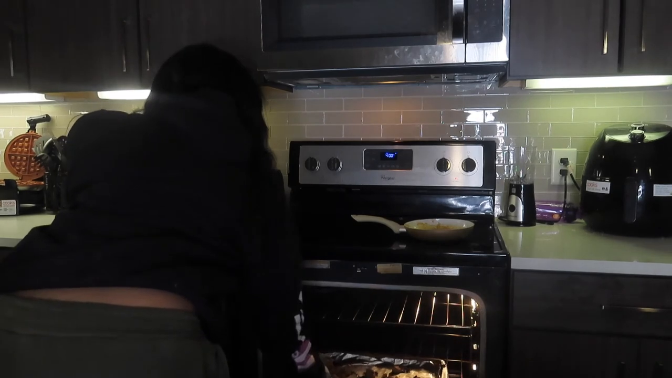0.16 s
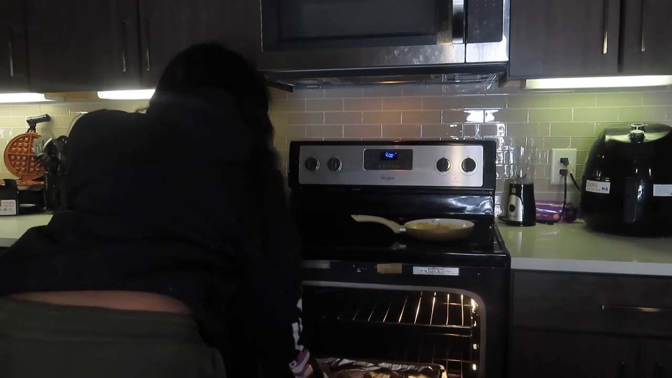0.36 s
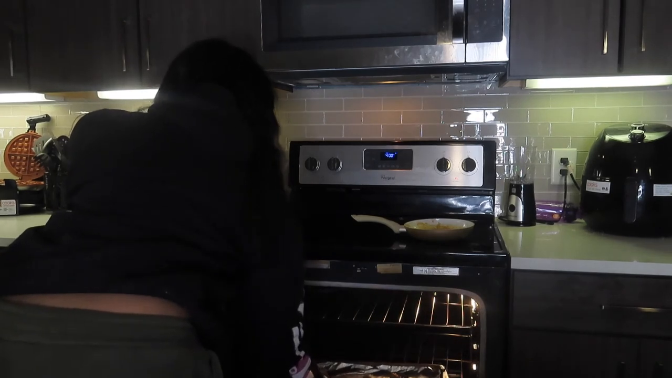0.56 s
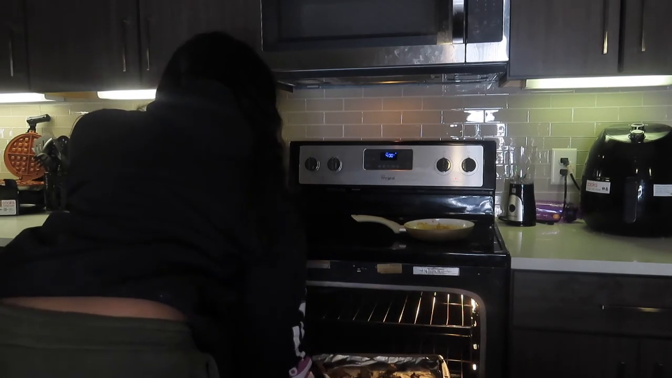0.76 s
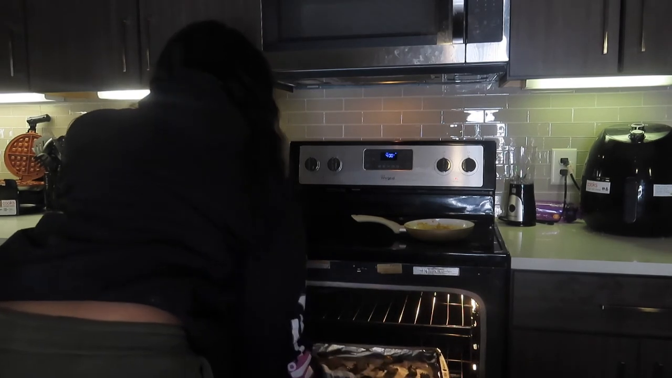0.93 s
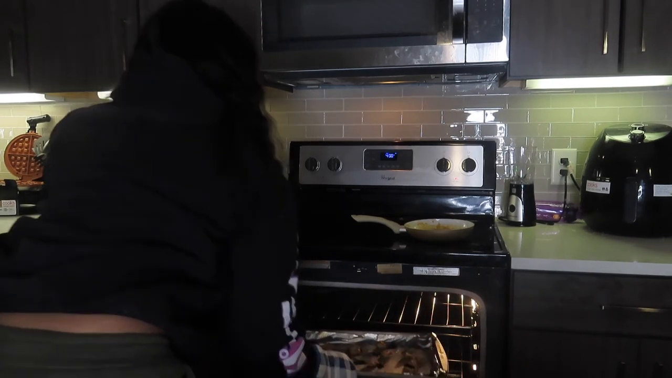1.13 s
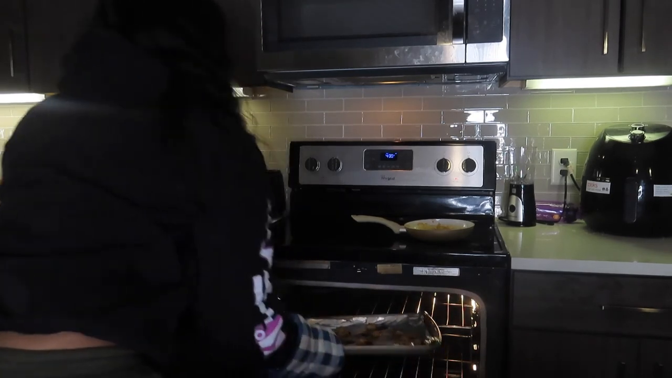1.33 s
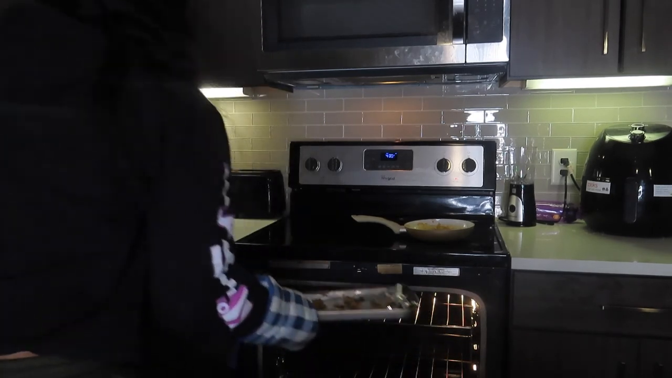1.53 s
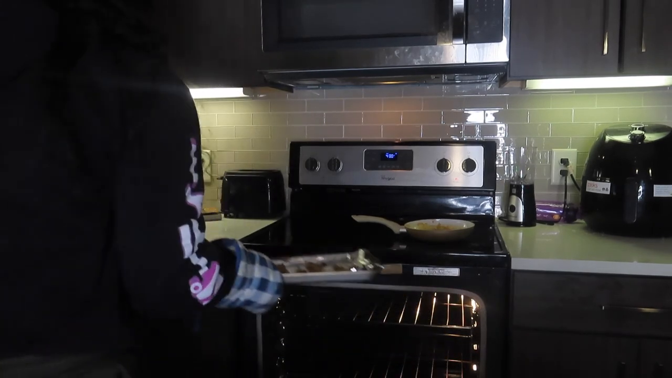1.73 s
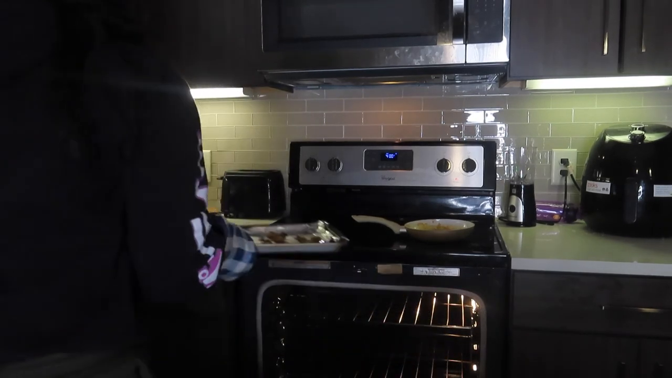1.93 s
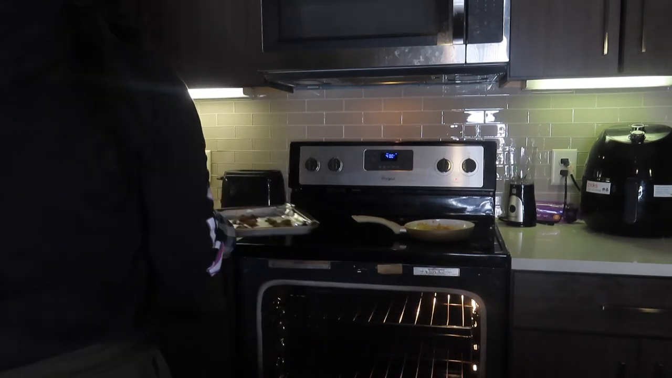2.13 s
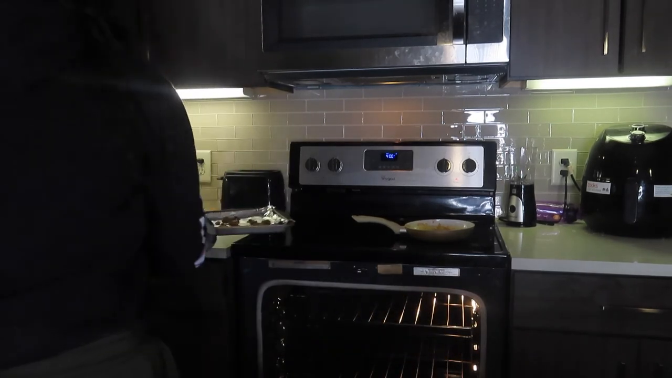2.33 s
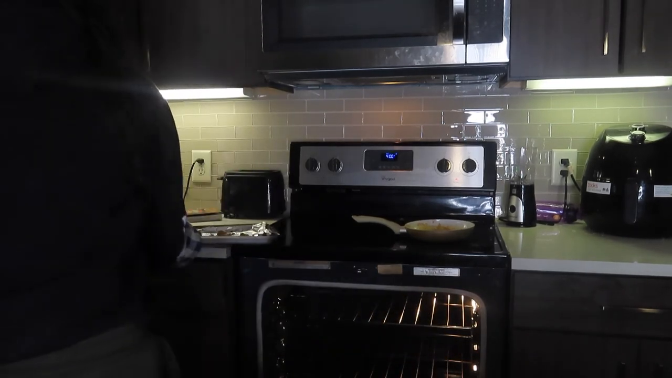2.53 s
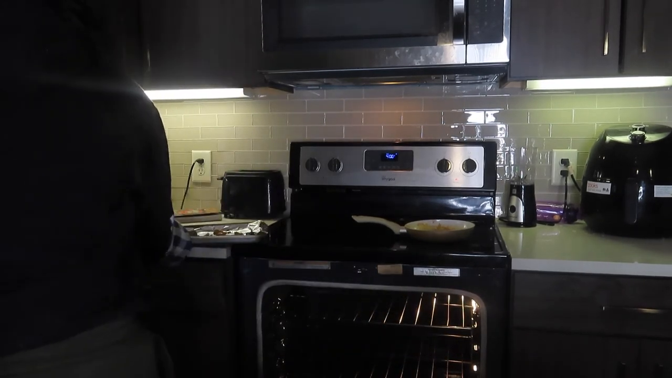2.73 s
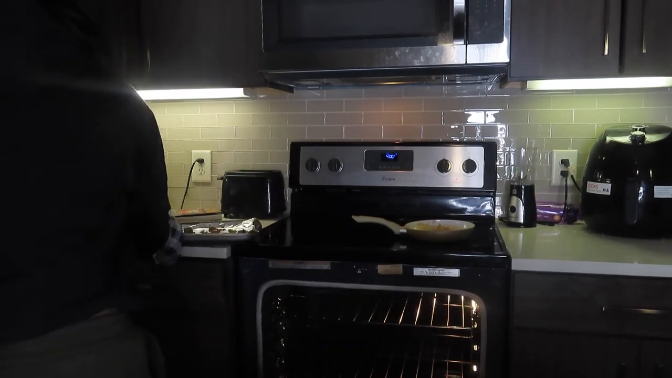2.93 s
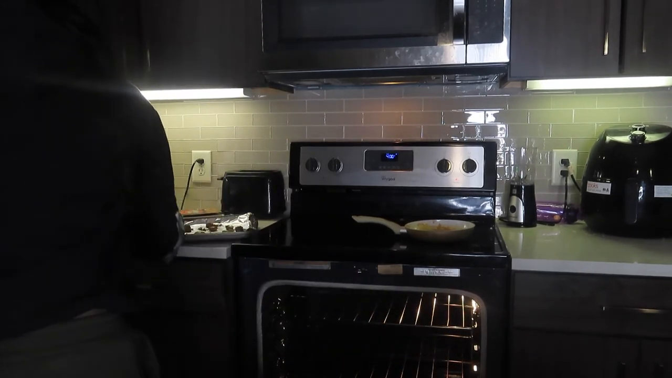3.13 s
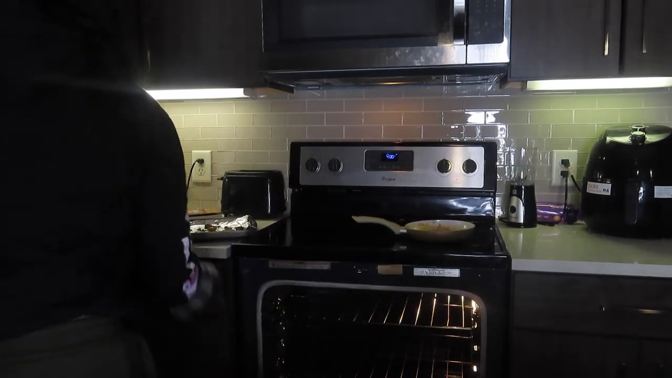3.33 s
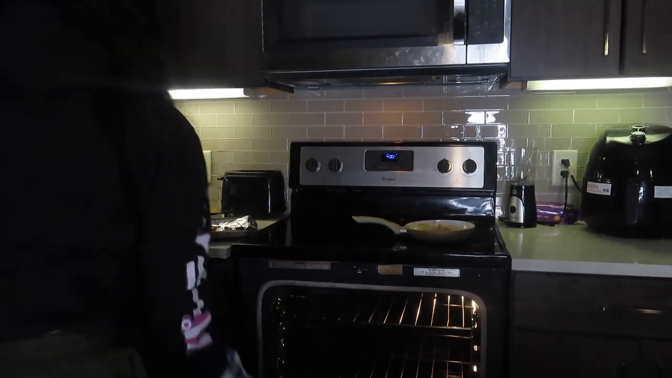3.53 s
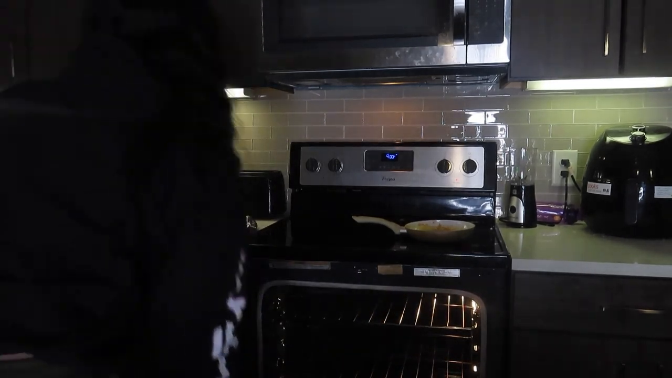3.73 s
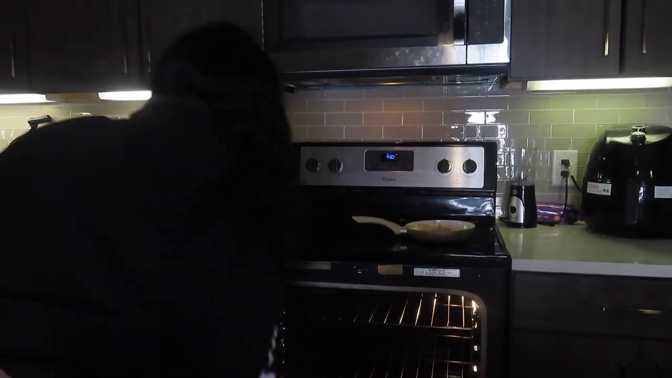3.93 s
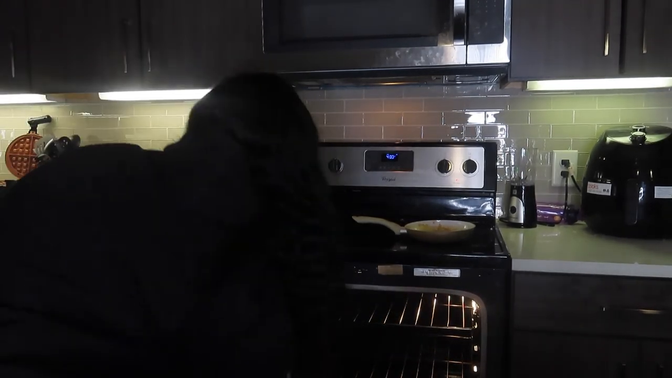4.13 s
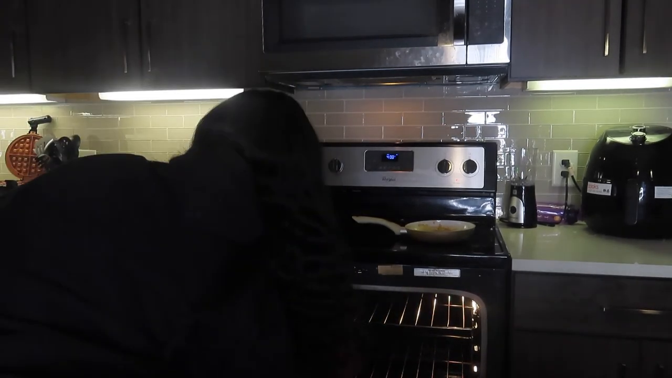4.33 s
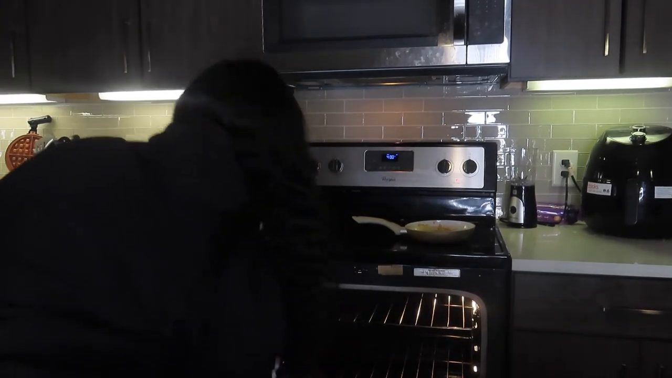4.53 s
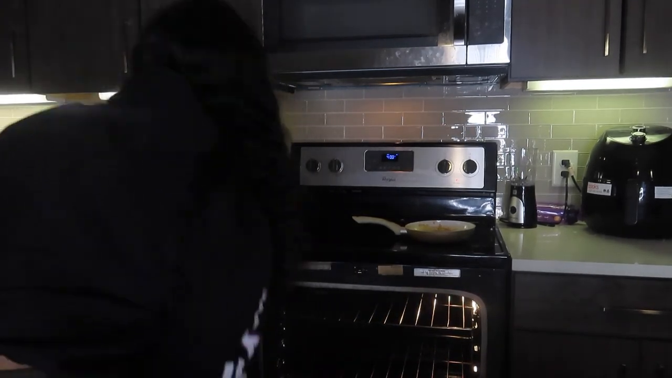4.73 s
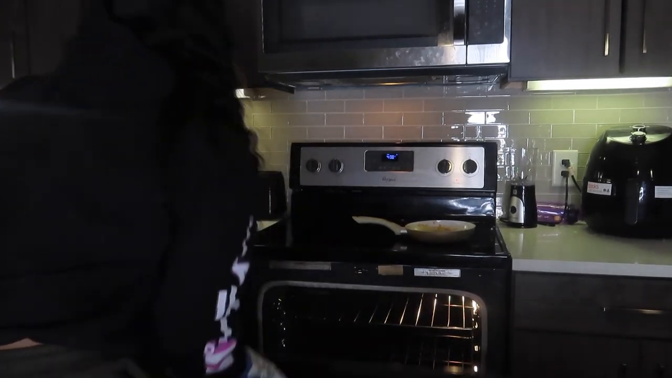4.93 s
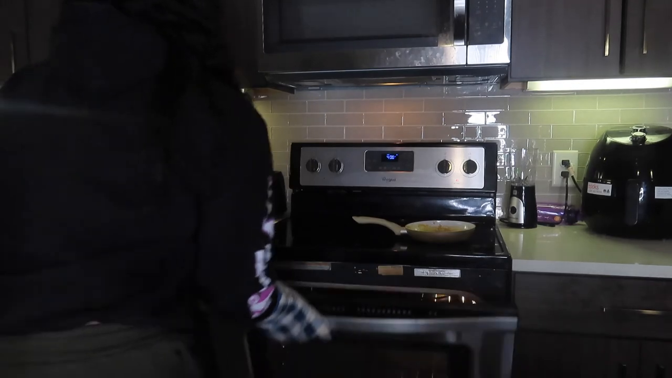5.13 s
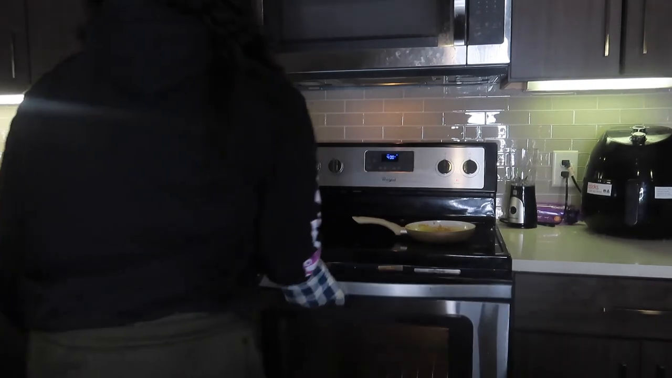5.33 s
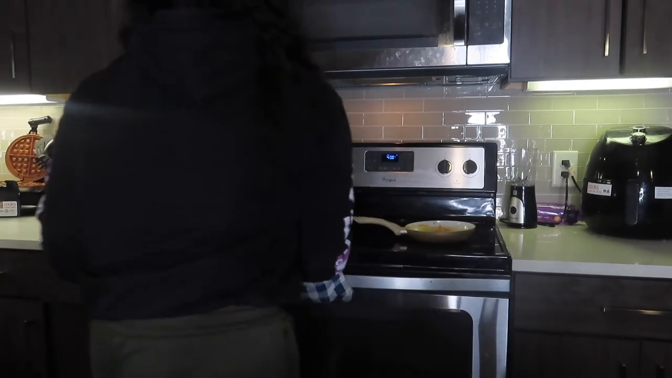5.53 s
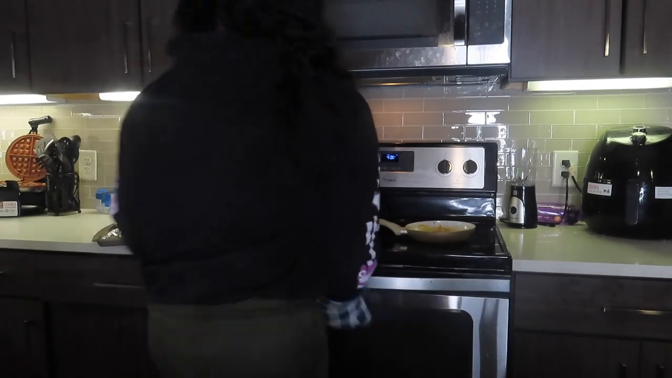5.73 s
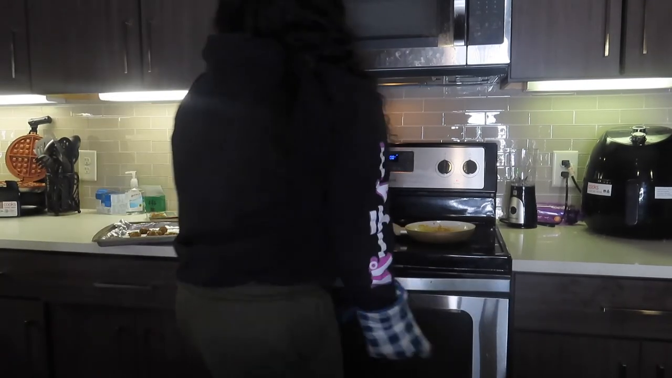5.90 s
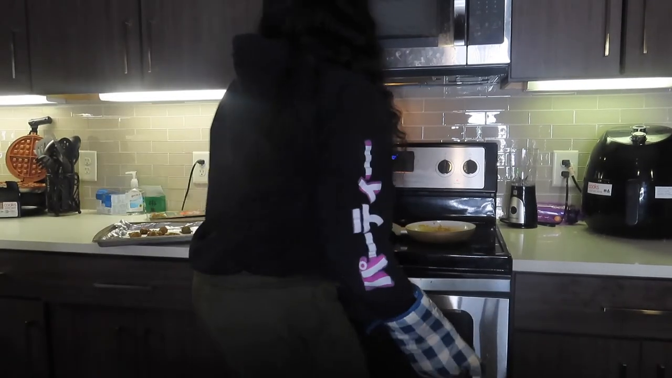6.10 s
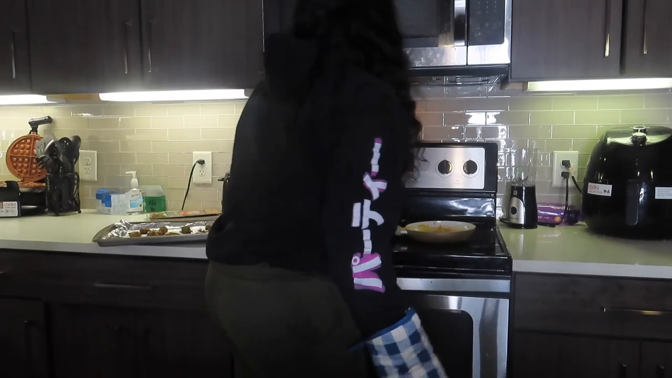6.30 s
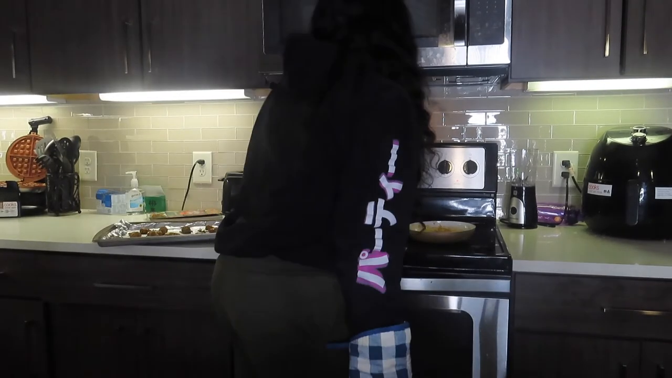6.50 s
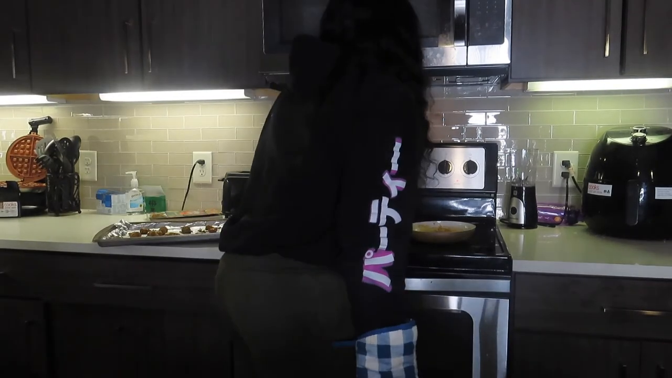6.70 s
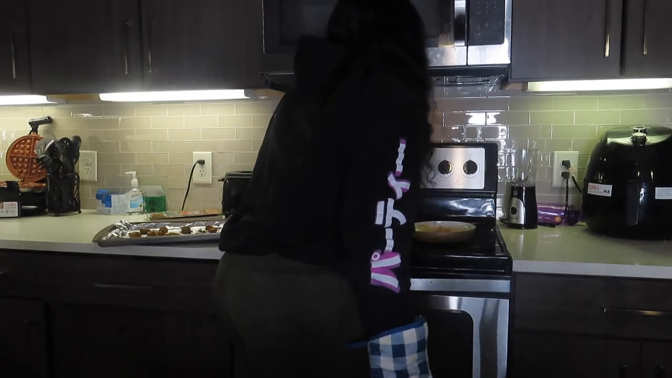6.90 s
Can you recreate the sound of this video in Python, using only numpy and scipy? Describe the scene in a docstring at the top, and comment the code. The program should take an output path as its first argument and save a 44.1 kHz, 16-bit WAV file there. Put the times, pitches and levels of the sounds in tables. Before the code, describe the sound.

A loaded metal baking sheet clatters loudly onto a kitchen worktop, gets shoved into place, then an oven door thumps shut over a faint hum.

```python
"""Baking sheet and oven door

A loaded metal baking sheet is drawn out of an oven, dropped on a worktop and shoved into place; the oven
door is then shut. Each blow is a short noisy chatter that sets ringing filters going, with a deep thud.
The sheet scrapes on the rack as filtered random clicks, cloth rustles, and noise bursts tick and swish.
A small hard kitchen echoes these sounds; wavering motor tones, steady air and a low rumble lie behind.
"""
import sys
import numpy as np
from scipy import signal
from scipy.fft import rfft, irfft
from scipy.io import wavfile

SR = 44100
rng = np.random.default_rng(int(sys.argv[2]) if len(sys.argv) > 2 else 0)


def log_audio(samples):
    """Write samples as a 16-bit WAV file to the path given in sys.argv[1]."""
    # one column per channel
    frames = np.atleast_2d(samples).T
    # limit to full scale, then quantise
    limited = np.clip(frames, -1, 1)
    pcm = np.round(limited * 32767).astype(np.int16)
    wavfile.write(sys.argv[1], SR, pcm)


N = 306921   # length of the scene in samples


def baking_sheet():
    """Metal sheet hitting the worktop: the sheet rings, damped by the food on it, and the worktop thuds."""
    # blows: start_s, level_db, chatter_fall_s, then thud_db, belly_db, rim_db relative to level_db
    sheet_blows = [(2.5139, -3, 0.012, -15.5, -4, -7), (2.5214, -4, 0.0047, -12, -14, 3),
                   (2.5544, -21, 0.017, 8.5, 3, -7), (2.5837, -13, 0.013, -29, 1, -3),
                   (2.6156, 0, 0.0096, -38, -12.5, -22), (2.6283, -5.5, 0.0075, -12, -13, -16),
                   (2.6662, -13.5, 0.02, -31, -2.5, -9.5), (2.7129, -23.5, 0.018, 9, 4.5, -5),
                   (2.777, -34, 0.11, 12.5, -8, -10), (2.9984, -13.5, 0.018, -5, -10, -18),
                   (3.0366, -27, 0.011, -1, 11.5, -2), (3.0632, -22.5, 0.019, -29, 6, -4),
                   (3.1467, -17, 0.011, 2, 2.5, -6), (3.1788, -25, 0.0079, 12.5, 8, -3),
                   (3.2244, -36, 0.0096, -15, -8, 5), (3.2835, -32, 0.022, -12, -21, 1.5),
                   (3.3177, -31.5, 0.0064, 3, -25, -2)]
    # ringing tones of the sheet: pitch_hz, width_hz, level_db (relative)
    # above a width of 34 Hz, a wider tone dies sooner; all narrower ones die alike
    sheet_tones = [(323, 57, 1.5), (423, 36, -3), (520, 31, -14), (557, 22, 3.5), (590, 20, 2.5),
                   (707, 26, -5), (745, 14, -7), (850, 28, 3.5), (1004, 25, 5.5), (1090, 52, -1),
                   (1177, 18, 2.5), (1260, 21, 2), (1320, 22, 3), (1600, 22, -22), (1663, 23, -25),
                   (1870, 25, -32), (1950, 11, 8), (2040, 16, -9), (2164, 23, 5), (2400, 60, 11.5),
                   (2540, 54, 9), (2820, 83, 3), (3036, 70, 5), (3430, 81, -2)]
    # deep tones of the worktop: pitch_hz, level_db (relative), t60_s (time to fall by 60 dB)
    worktop_tones = [(83, -1, 0.18), (138, 3.5, 0.25), (185, 8, 0.059), (274.4, 2, 0.16)]
    return struck(sheet_blows, sheet_tones, worktop_tones, ring_db=-53.5, sizzle_db=-2, rise_s=0.0013)


def oven_door():
    """Door hitting its hinge stop and frame: the door rings, and the oven cavity and panel boom."""
    # blows: start_s, level_db, chatter_fall_s, then thud_db, belly_db, rim_db relative to level_db
    door_blows = [(5.1215, -38, 0.018, 6, 9.5, -0.5), (5.1486, -36, 0.019, 13.5, 13, -20),
                  (5.2091, -21.5, 0.01, 10, 4.5, -4.5), (5.232, -36.5, 0.054, -6, -7, -22),
                  (5.4232, -30, 0.013, 24, 3.5, -1), (5.437, -11.5, 0.0092, 3.5, -3.5, -4),
                  (5.4574, -20.5, 0.028, 9, -9, -4.5), (5.4753, -14.5, 0.0081, 7.5, 0.5, -20),
                  (5.4914, -24, 0.015, 16, -7, 2.5), (5.5098, -14.5, 0.012, -1, -9, -2.5),
                  (5.558, -29, 0.021, -8, -4, -3), (5.6154, -32.5, 0.024, 1, -7.5, -6),
                  (5.691, -37, 0.043, -7, 0, -3.5)]
    # ringing tones of the door: pitch_hz, width_hz, level_db (relative)
    # above a width of 34 Hz, a wider tone dies sooner; all narrower ones die alike
    door_tones = [(255, 27, 10.5), (332, 28, 4.5), (430, 60, 0.5), (496, 28, -2), (660, 160, 5),
                  (790, 30, -18), (940, 72, -11), (1090, 54, -18), (1390, 35, -25), (1550, 42, -2),
                  (1778, 52, 1), (2280, 54, 1), (2480, 22, -13), (2900, 40, -8), (3460, 40, -19)]
    # deep tones of the oven cavity and panel: pitch_hz, level_db (relative), t60_s
    boom_tones = [(27.8, -10, 0.23), (59.6, -0.5, 0.17), (96.6, 2.5, 0.21), (127, -5.5, 0.58),
                  (159.4, 1, 0.29), (198.5, 5.5, 0.18)]
    return struck(door_blows, door_tones, boom_tones, ring_db=-49.5, sizzle_db=-3.5, rise_s=0.0025)


def struck(blows, tones, low_tones, ring_db, sizzle_db, rise_s):
    """Each blow chatters briefly; it is heard directly, rings every tone by its own amount and thuds below."""
    # frequency bands of belly, body, rim and sizzle: low_hz, high_hz
    bands_hz = [(230, 900), (900, 2300), (2300, 4300), (4300, 15000)]
    late_factors = (1.9, 1.94, 2.85, 6.9)   # rise time of each band, in multiples of rise_s
    sizzle_per_rim = 1.24   # the sizzle swings more than the rim: dB per dB
    push_s = .0015
    start, size = round(blows[0][0] * SR), round(.3 * SR)
    span = round((blows[-1][0] + 1.2) * SR) - start
    t = np.arange(size) / SR
    contact, push = np.zeros((len(blows), span)), np.zeros(span)
    for row, (start_s, level_db, chatter_s, thud_db, belly_db, rim_db) in zip(contact, blows):
        first = round(start_s * SR) - start
        at = slice(first, first + size)
        fall = np.exp(-t / max(chatter_s, .001))
        # flat landings move the belly, edge contacts the rim; the sizzle follows a moment later
        parts_db = (belly_db, 0, rim_db, sizzle_per_rim * rim_db + sizzle_db)
        for band_hz, part_db, late in zip(bands_hz, parts_db, late_factors):
            shape = fall * (1 - np.exp(-t / (late * rise_s)))   # the contact spreads, then dies
            chatter = cut(grains(size, 8000, 3.2), 3300, "low")   # no contact is perfectly hard
            chatter = rms_one(cut(chatter, band_hz, "band"))
            row[at] += amp(level_db + part_db) * chatter * shape
        # the soft push of the weight
        push[at] += amp(level_db + thud_db) * t / push_s * np.exp(-t / push_s)

    # every blow excites every tone by a different random amount
    shape = (len(blows), len(tones))
    share = amp(rng.normal(0, 3, shape)) * rng.choice([-1, 1], shape)
    out = amp(-3.5) * contact.sum(axis=0)   # the chatter heard directly
    for k, (hz, width_hz, level_db) in enumerate(tones):
        t60_s = np.log(1000) / np.pi / max(width_hz, 34)
        out += amp(level_db + ring_db) * ring(share[:, k] @ contact, hz, t60_s)

    boom = np.zeros(span)
    for k, (hz, level_db, t60_s) in enumerate(low_tones):
        boom += amp(level_db - 46) * ring(push, hz, t60_s) * (-1) ** k
    out += cut(boom, low_tones[0][0] * .7, "high")
    return np.pad(out, (start, N))[:N]


def drag():
    """The sheet slips over the rack in jerks, heard as uneven clicks; rack bars squeak where it rubs them."""
    # slips: peak_s, level_db
    slips = [(0.0, -44), (0.206, -50), (0.324, -50), (0.43, -63)]
    # squeaks of rack bars: start_s, pitch_hz, peak_db, rub_length_s
    squeaks = [(.005, 1390, -41, 0.051), (0.021, 737, -35.5, .09), (0.085, 2420, -41, 0.033),
               (0.407, 1246, -42, 0.033)]
    bar_t60_s = .035
    jerks = sum(swell(peak_s, level_db, rise_s=0.03, fall_s=0.08) for peak_s, level_db in slips)
    scrape = jerks * rms_one(cut(grains(N, 2500, 1.4), [350, 3300], "band", order=3))
    for start_s, hz, peak_db, rub_s in squeaks:
        rub, size = np.zeros(N), round(rub_s * SR)
        rub[round(start_s * SR):][:size] = np.hanning(size) * rng.standard_normal(N)[:size]
        squeak = ring(rub, hz, bar_t60_s)
        scrape = scrape + amp(peak_db) * squeak / np.abs(squeak).max()
    return scrape


def rustle():
    """Cloth and mitt: clumped fine grains of rubbing fabric, with a crisper top where the weave catches."""
    # strokes: peak_s, level_db, rise_s, fall_s (times to change by a factor e), crisp_db (relative)
    cloth_strokes = [(0.75, -60, 0.0088, 0.011, 7), (0.99, -60, .015, 0.042, -3), (1.25, -68, .05, 0.11, 0),
                     (1.69, -50.5, 0.071, 0.073, -11), (1.96, -65, .003, 0.032, 3),
                     (2.04, -61, .01, 0.11, -16), (4.18, -59, 0.044, 0.093, -24),
                     (4.412, -54.5, .008, 0.052, -27), (4.635, -50.5, 0.032, 0.25, -25),
                     (4.94, -49.5, 0.034, 0.034, -25), (5.1, -55, .03, 0.034, -24),
                     (5.99, -59.5, 0.053, 0.076, -19), (6.2, -55, 0.017, 0.059, -3)]
    # tone colour of the cloth: frequency_hz, level_db (per Hz, relative)
    cloth_colour = [(350, -15), (600, 0.5), (1540, 5.5), (2540, 7.5), (5180, -4.5), (7250, -12),
                    (12300, -49), (15000, -35)]
    fidget_db, fidget_crisp_db = -66.5, -9.5   # the clothes never fall quite silent; crisp is relative
    clumps = amp(2.0 * drift(40))
    fibres = rms_one(coloured(grains(N, 9000, 3.4), cloth_colour))
    crisp = rms_one(cut(grains(N, 9000, 3.0), [6000, 13000], "band"))
    strokes = np.array([swell(*row[:4]) for row in cloth_strokes])
    stroke_crispness = amp([row[4] for row in cloth_strokes])
    dull_gain = amp(fidget_db) + strokes.sum(axis=0)
    crisp_gain = amp(fidget_db + fidget_crisp_db) + stroke_crispness @ strokes
    return clumps * (dull_gain * fibres + crisp_gain * crisp)


def swishes():
    """One surface sliding on another, at the handle or under the sheet: a brief hiss an octave wide."""
    # slides: start_s, level_db, centre_hz, rise_s, fall_s
    slides = [(6.18, -45, 2830, .012, 0.064), (3.02, -47, 8100, 0.027, 0.095),
              (3.283, -43.5, 9800, 0.007, 0.035), (3, -58, 8300, 0.01, .03)]
    out, t = np.zeros(N), np.arange(SR // 3) / SR
    for start_s, level_db, hz, rise_s, fall_s in slides:
        band_hz = [hz / np.sqrt(2), hz * np.sqrt(2)]
        hiss = rms_one(cut(rng.standard_normal(len(t)), band_hz, "band"))
        shape = np.minimum(t / rise_s, 1) * np.exp(-np.maximum(t - rise_s, 0) / fall_s)
        out[round(start_s * SR):][:len(t)] += amp(level_db) * hiss * shape
    return out


def ticks():
    """Small ticks, some from cloth catching: noise bursts two octaves wide, dying sooner the higher they are."""
    # small ticks: start_s, level_db, centre_hz
    small_ticks = [(0.129, -45.5, 2410), (0.454, -46.5, 2020), (0.743, -48.5, 3080), (0.987, -46, 2480),
                   (1.05, -44, 9000), (1.956, -34.5, 5350), (2.042, -47, 2450), (3.418, -39, 9900),
                   (3.819, -46, 9000), (4.94, -50, 1920), (6.206, -45, 3160), (6.29, -46, 2390)]
    fall_cycles = 15   # cycles of the centre frequency to fall by a factor e
    out, t = np.zeros(N), np.arange(2000) / SR
    for start_s, level_db, hz in small_ticks:
        burst = rms_one(cut(rng.standard_normal(len(t)), [hz / 2, hz * 2], "band", order=1))
        out[round(start_s * SR):][:len(t)] += amp(level_db) * burst * np.exp(-t * hz / fall_cycles)
    return out


def kitchen(x):
    """Room echo: noise that dies at its own rate in each octave, alike in both channels except in the treble."""
    # how long the echo lasts: frequency_hz, t60_s
    echo_times = [(100, 0.71), (500, 0.76), (2000, 0.39), (4000, 0.44), (7000, 0.24), (14000, 0.26)]
    # difference between the channels: frequency_hz, side_db (gain on the side signal)
    echo_width = [(60, -53), (250, -52), (1000, -35), (2500, -32), (5000, -6), (12000, -0.5)]
    echo_db = -4
    t, tails = np.arange(SR) / SR, 0
    for low_hz in 40 * 2.0 ** np.arange(9):
        band = cut(rng.standard_normal((2, SR)), [low_hz, 2 * low_hz], "band")
        t60_s = at_hz(echo_times, low_hz * np.sqrt(2))
        tails = tails + band * amp(-60 * t / t60_s)
    build = np.clip(t / 0.014, 0, 1)   # reflections build up over the first wall distances
    near_mic = amp(9.5) * np.exp(-t / 0.004)   # scatter round the microphone differs at its two ports
    tails = tails * np.array([build, build + near_mic])
    tails = tails / np.sqrt(np.sum(tails[0] ** 2))
    mid, side = signal.fftconvolve(x[None], tails, axes=1)[:, :N]
    side = coloured(side, echo_width)
    return amp(echo_db) * np.array([mid + side, mid - side])


def hum():
    """Motor tones of an appliance: sines, each wavering a little in level and phase."""
    # motor tones: pitch_hz, level_db (rms, before the waver)
    motor_tones = [(120.0, -49.5), (170.0, -52), (273.3, -58.5), (339.7, -60), (356, -84), (410.5, -65)]
    t, out = np.arange(N) / SR, 0
    for hz, level_db in motor_tones:
        waver_db, shift_rad = 1.2 * drift(5), .3 * drift(3)
        tone = np.sqrt(2) * np.sin(2 * np.pi * hz * t + shift_rad)
        out = out + amp(level_db + waver_db) * tone
    return out


def air():
    """Steady rush of fan and room: coloured noise, with the channels differing more in the treble."""
    # tone colour of the air: frequency_hz, level_db (per Hz, relative)
    air_colour = [(12, -14), (22, -5), (60, 3.5), (100, 2), (200, 4.5), (330, 2.5), (450, 0.5), (750, -6.5),
                  (1500, -10.5), (3000, -12.5), (6000, -18.5), (11200, -24.5), (14000, -27), (15600, -36)]
    # difference between the channels: frequency_hz, side_db (relative to mid)
    air_width = [(60, -16.5), (180, -8), (550, -4), (1650, -6.5), (4970, -8), (15000, 0.5)]
    air_db = -48.5   # rms level of the mid signal
    mid = coloured(rng.standard_normal(N), air_colour)
    side = coloured(rng.standard_normal(N), air_colour)
    side = coloured(side, air_width)
    return amp(air_db) / np.std(mid) * np.array([mid + side, mid - side])


def rumble():
    """Low rumble that swells now and then: deep noise under a slow gain."""
    # swells: peak_s, level_db, rise_s, fall_s
    rumble_swells = [(0.12, -50, .1, .06), (5.9, -41.5, 0.25, 0.27)]
    gain = sum(swell(*row) for row in rumble_swells)
    return gain * rms_one(cut(rng.standard_normal(N), [22, 90], "band"))


def amp(db):
    """Turn decibels into a gain."""
    return 10 ** (np.asarray(db) / 20)


def rms_one(x):
    """Scale to an rms (average strength) of 1."""
    return x / np.sqrt(np.mean(x ** 2) + 1e-20)


def at_hz(points, hz):
    """Read between the points of a table, on a log-frequency axis."""
    table_hz, values = np.array(points).T
    return np.interp(np.log(hz), np.log(table_hz), values)


def drift(rate_hz):
    """Slow random wander of spread about 1: smoothed noise, made at every 40th sample and joined by lines."""
    step = 40
    r = np.exp(-2 * np.pi * step * rate_hz / SR)
    noise = rng.standard_normal(N // step + 2002)
    slow = signal.lfilter([1], [1, -2 * r, r * r], noise)[2000:]   # drop the filter's start-up
    return np.interp(np.arange(N) / step, np.arange(len(slow)), rms_one(slow))


def cut(x, hz, kind, order=2):
    """Butterworth filter: keeps the lows, the highs or a band."""
    sos = signal.butter(order, np.clip(hz, 10, .45 * SR), kind, fs=SR, output="sos")
    return signal.sosfilt(sos, x)


def coloured(x, spectrum):
    """Shape a sound by the frequency gains of a table."""
    hz = np.maximum(np.fft.rfftfreq(N, 1 / SR), 1)
    return irfft(rfft(x) * amp(at_hz(spectrum, hz)), N)


def ring(x, hz, t60_s):
    """Ringing filter: a unit click starts a dying sine of starting height 1."""
    r, w = amp(-60 / (t60_s * SR)), 2 * np.pi * hz / SR
    return signal.lfilter([0, np.sin(w)], [1, -2 * r * np.cos(w), r * r], x + 1e-18)


def grains(size, per_s, spread_db):
    """Random contacts of uneven strength, as single-sample clicks; rms about 1."""
    strength = amp(spread_db * np.minimum(rng.exponential(1, size), 4))
    strength = strength * rng.choice([-1, 1], size)
    return rms_one(strength * (rng.random(size) < per_s / SR))


def swell(peak_s, level_db, rise_s, fall_s):
    """Gain that grows exponentially up to a peak and then dies away."""
    t = np.arange(N) / SR - peak_s
    return amp(level_db) * np.exp(np.where(t < 0, t / max(rise_s, .002), -t / max(fall_s, .002)))


def scene():
    """All sources in the room: direct sound slightly stronger on the left, its echo, and the background."""
    near = baking_sheet() + oven_door() + drag() + rustle() + swishes() + ticks()
    direct = near * amp([[.3], [-.3]])
    return direct + kitchen(cut(near, 104, "high")) + hum() + air() + rumble()


def record(dry):
    """Peaks clip near full scale, then a steep filter cuts the top."""
    cutoff_hz = 15800
    clipped = np.clip(dry, -.94, .94)
    return signal.sosfilt(signal.cheby2(16, 60, cutoff_hz, fs=SR, output="sos"), clipped)


dry = scene()
out = record(dry)
log_audio(out)
```